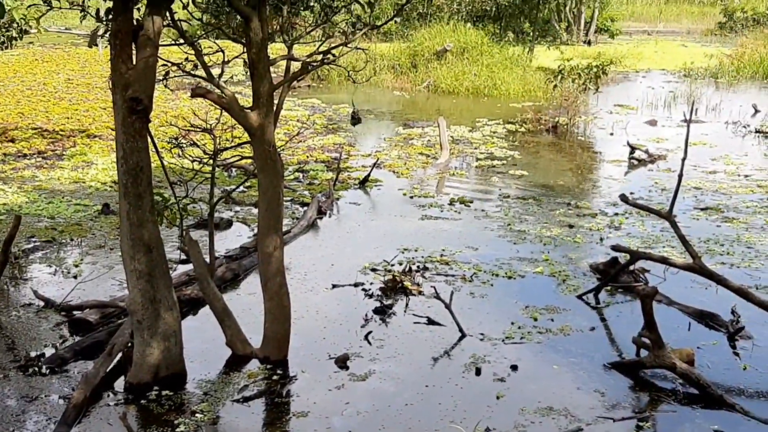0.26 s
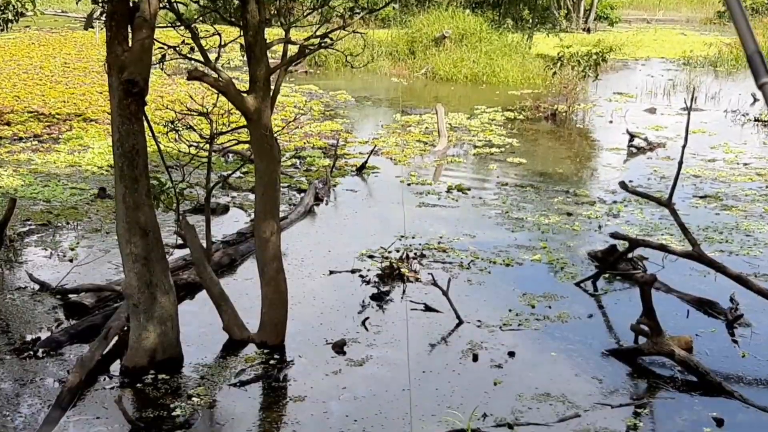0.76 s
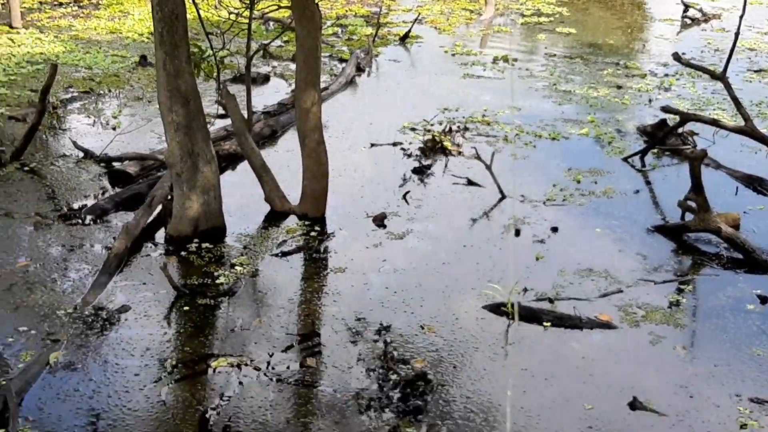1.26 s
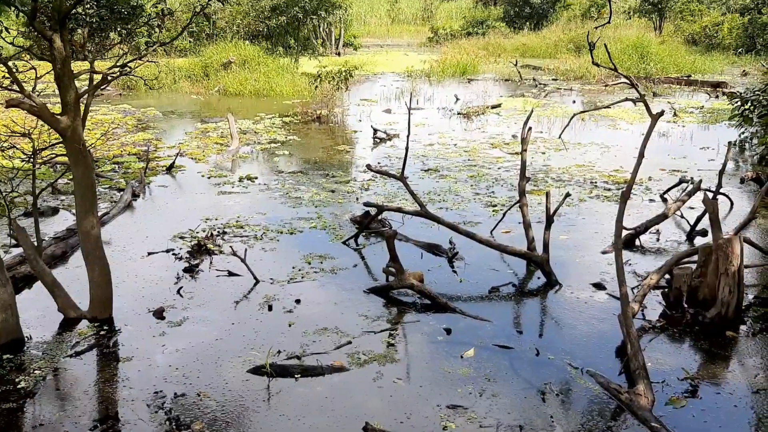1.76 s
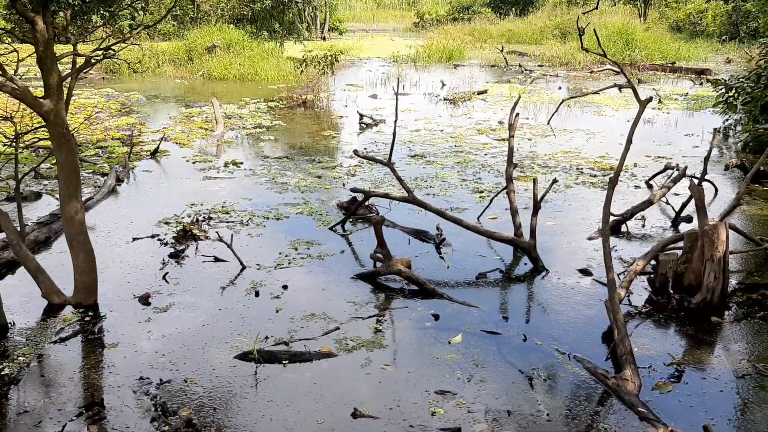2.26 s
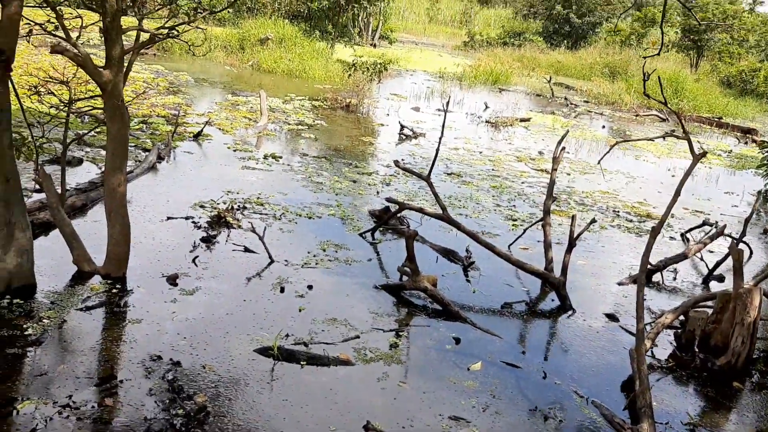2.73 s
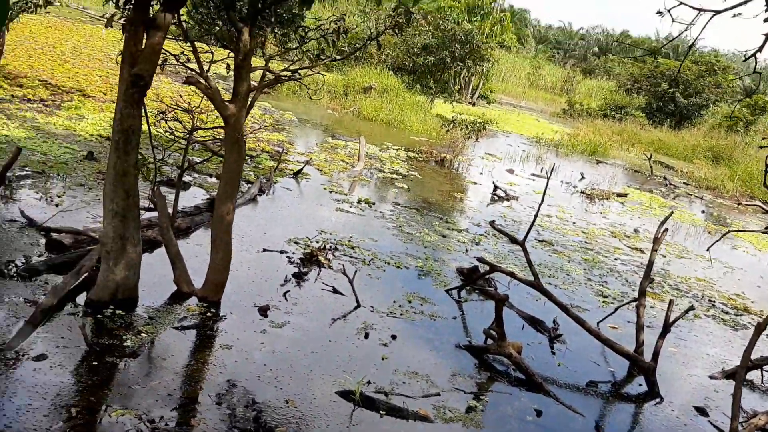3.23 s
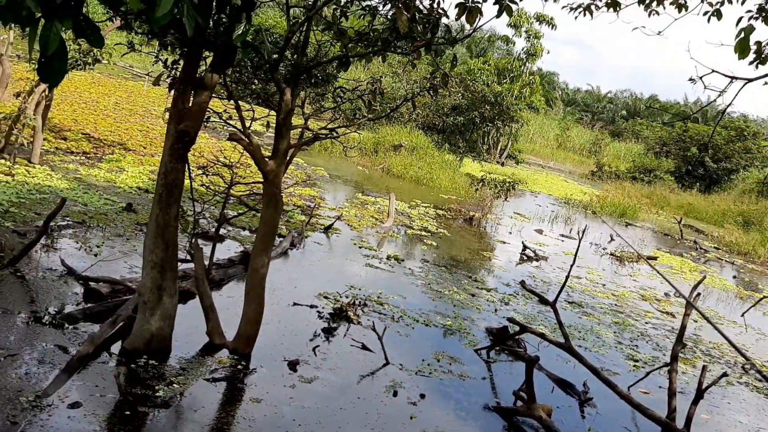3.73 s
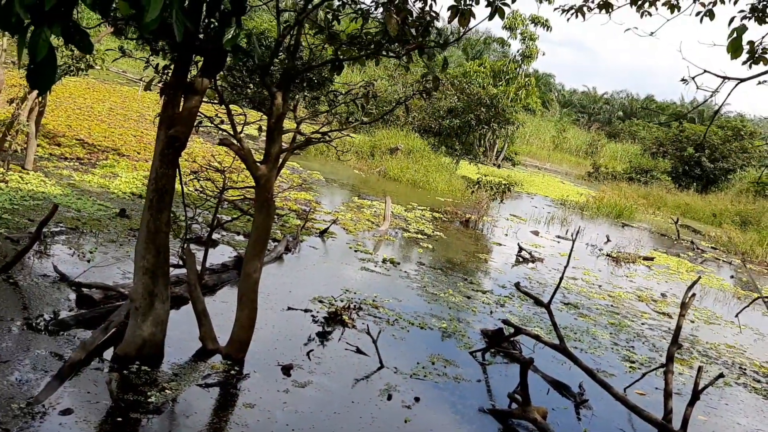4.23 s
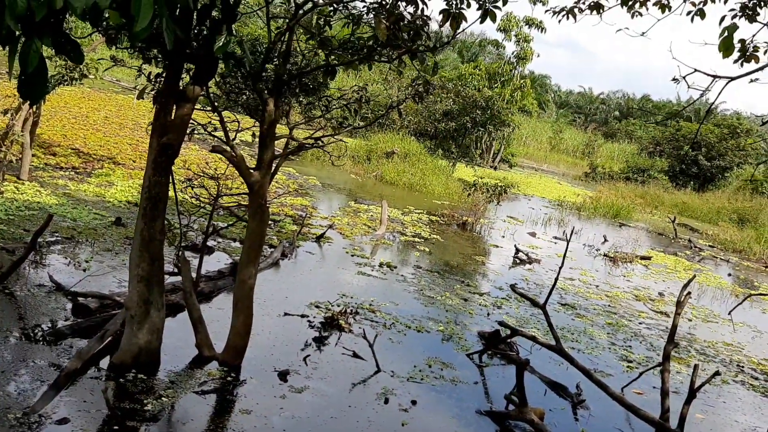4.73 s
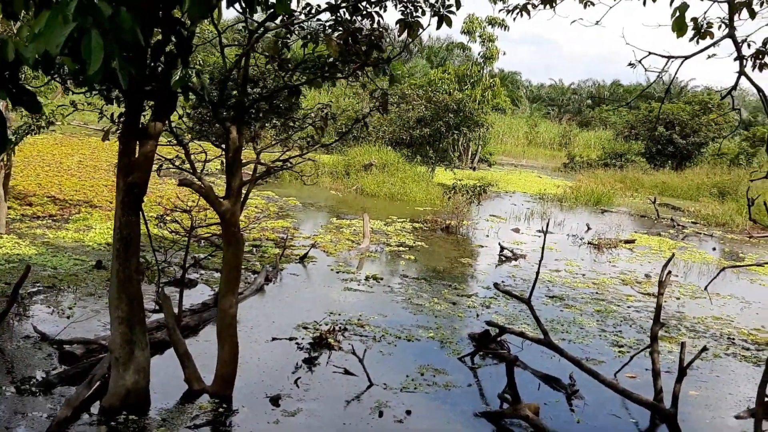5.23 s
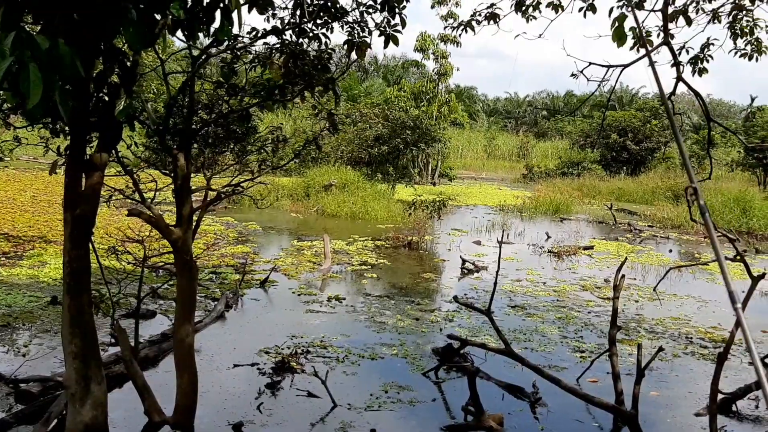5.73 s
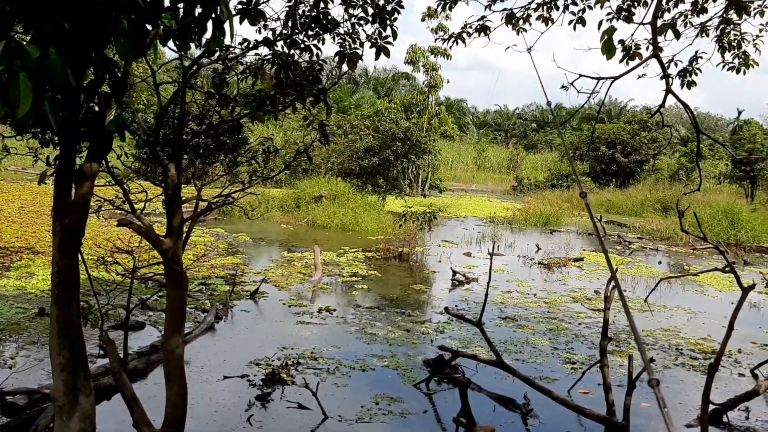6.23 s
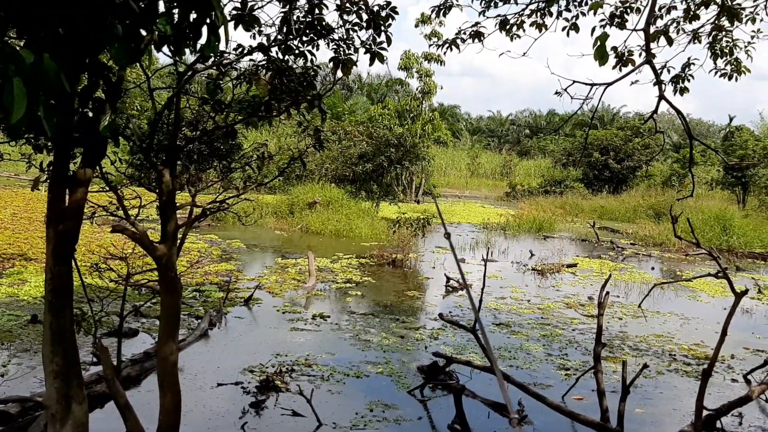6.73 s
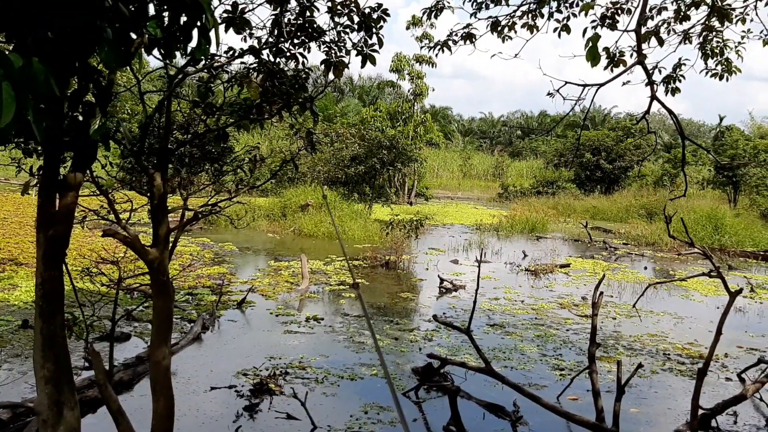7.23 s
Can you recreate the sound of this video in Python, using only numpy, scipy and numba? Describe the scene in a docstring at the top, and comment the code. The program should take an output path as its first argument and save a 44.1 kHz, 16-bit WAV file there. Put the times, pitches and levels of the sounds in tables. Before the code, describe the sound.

A quiet swamp, heard in stereo from close to the angler. Thin leaf and insect hiss, a low distant engine that revs and drops, and a very high katydid pulsing five or six times a second in bouts form the background. At 0.7 s a faint far whistle glides down; small watery drips plink around 1.8-2.0 and 2.4 s. At 2.88 s the reel's bail snaps open, loud, hard and metallic, with a short woody tail from the trees. Around 3.3-3.55 s come smaller clicks, a fast airy swish and a thin whistle of taut line; a dense, bright ticking whir then fades until about 5. A frog rasps four times from 4.16 to 4.6 s, slightly right. Wind buffets low on the left near 4.8, the engine swells, and light hollow knocks sound at 5.0-5.6. At 5.68 s the bail clacks shut, its wire singing briefly. Faint whistles and tiny taps follow, with insect and engine continuing to 7.4.

```python
"""Cast at the edge of a swamp. An engine drones and air hisses far off; a katydid throbs (shaped noise strokes)
and far whistles (gliding tones) and drips (short rings) come first. Then the reel's bail snaps open (rattles
that ring metal), the rod swishes (noise in moving bands) and line whirs off the spool (dense ticks and hiss).
A frog rasps four times on the right (pulses ringing a throat), wind buffets (low noise), the rod knocks,
the bail snaps shut and its wire sings; more whistles follow. Trees return near sounds as noisy tails."""
import sys
import numpy as np
from scipy import signal
from scipy.fft import rfft, irfft, next_fast_len
from scipy.io import wavfile
from scipy.ndimage import uniform_filter1d, map_coordinates
from numba import njit

SR = 44100
rng = np.random.default_rng(int(sys.argv[2]) if len(sys.argv) > 2 else 0)


def generate_wav(signal):
    """Clip the signal to [-1, 1] and save it as 16-bit WAV at the path in sys.argv[1]."""
    frames = np.transpose(np.atleast_2d(signal))
    scaled = np.clip(frames, -1, 1) * 32767
    pcm = np.round(scaled).astype(np.int16)
    wavfile.write(sys.argv[1], SR, pcm)


N = 329768

# Blows of the bail and reel; level is the peak of the reel part, wire is relative to it:
# start_s, level_db, wire_db, left_minus_right_db, rattle_s, left_lag_ms
CLICKS = [(2.872, -31.5, 7, 2.5, 0.00087, .09), (2.8766, -12.5, 3, -18, 0.0017, .09),
          (2.878, -8.5, 11.5, 0, 0.00082, .09), (2.880, -15, -4, 6, 0.0011, .09),
          (2.882, -17, -8, 12, 0.0012, .09), (2.8847, -18, -6, 2, .0006, .09),
          (3.305, -26.5, -6, 15.5, 0.00041, .09), (3.342, -22.5, -19, 6, 0.0004, .09),
          (3.4008, -22, -9, 9, 0.0031, .2), (3.406, -26, -14, -8, 0.00086, .2),
          (3.477, -16, -8, 3, 0.00069, .2), (3.565, -30.5, -15, -17, .0006, .2),
          (4.958, -44, 9, -2, 0.0026, .09), (5.031, -36, -5, 1, 0.0007, .09),
          (5.097, -45, -12, 4, 0.0011, .09), (5.3311, -35.5, -22, -2.5, 0.00058, .09),
          (5.592, -36.5, -15, -6, 0.00091, .09), (5.658, -24, 5, 4.5, 0.001, .14),
          (5.6596, -22, 5, 4, .0004, .14), (5.663, -29, 2, 2, 0.0033, .14),
          (5.6764, -10, 2, -5, .0008, .11), (5.6839, -10.5, 5.5, 15, 0.0014, .01),
          (5.6853, -15, 4.5, -6.5, 0.001, .01), (5.693, -23.5, -3.5, 4.5, 0.0009, .09),
          (5.7041, -19, 3.5, 7, 0.0003, .23), (5.7067, -24, 0.5, -16, 0.002, .23),
          (5.71, -25.5, 2.5, 16.5, 0.0011, .23), (6.414, -55.5, 11, 9, 0.00097, .09),
          (6.434, -44.5, -23, 13, 0.00087, .09), (6.527, -47, -16, 1, 0.0011, .09)]
# Resonances of the reel body: pitch_hz, width_hz, level_db
REEL_MODES = [(510, 1100, -11), (1620, 800, 1), (3320, 2040, -3), (5200, 1300, -3)]
# Resonances of the bail wire: pitch_hz, width_hz, level_db
BAIL_MODES = [(6827, 6500, -1), (8730, 350, -8), (10850, 1700, -3), (14100, 500, -3), (15800, 1900, -10)]
# What the trees return of a click: pitch_hz, width_hz, level_db
SCATTER_BANDS = [(580, 910, -11), (1790, 2500, -3.5), (3840, 2400, 2.5), (11000, 7300, -2)]
# Air rushing past the rod; low_db is the share near 935 Hz against the hiss:
# time_s, level_db, hiss_centre_hz, low_db
RUSH = [(3.33, -61, 1500, -4), (3.35, -48, 1900, -16), (3.38, -54, 1800, -13), (3.403, -36.5, 1975, -13),
        (3.415, -38, 2114, -14), (3.435, -49, 2880, 1), (3.46, -44, 3860, -6), (3.482, -43.5, 2380, -5),
        (3.51, -57, 3600, 1), (3.55, -52, 3000, -4), (3.75, -67, 2485, -8)]
# Whistle of the taut line: pitch_hz, width_hz, top_level_db
LINE_WHISTLE = [(1560, 130, -53), (2840, 200, -64), (3580, 130, -54.5)]
# Line leaving the spool; high_db is the treble share before fixed lifts: time_s, level_db, high_db
SPOOL = [(3.3, -66, -8), (3.35, -51, -8), (3.385, -50, 2), (3.405, -44.5, 5.5), (3.483, -42.5, 10),
         (3.58, -45, 10.5), (3.71, -51.5, 13.5), (4.124, -61, 15), (4.2, -57.5, 8), (4.45, -59, 4.5),
         (4.694, -56, 5), (4.8, -66.5, 6), (4.95, -75, 11), (5.1, -78.5, 20.5)]
# Lower resonances of the whirring line: pitch_hz, width_hz, level_db
SPOOL_LOW = [(1440, 280, -1), (3220, 2300, 0), (5400, 2000, -5)]
# Upper resonances of the whirring line: pitch_hz, width_hz, level_db
SPOOL_HIGH = [(7800, 5900, -0.5), (11900, 4500, 2.5), (16000, 5000, 1.5)]
# The rod sinks after the cast, so the lag of the left port shrinks: time_s, left_lag_ms
SPOOL_LAG = [(3.7, .235), (4.12, 0.19)]
# Frog calls; start_db is relative to the top: start_s, level_db, swell_s, start_db, length_s
FROG = [(4.158, -35, 0.037, -12.5, 0.051), (4.296, -34, 0.028, -5.5, .04), (4.432, -34, 0.0295, -6, 0.041),
        (4.576, -35, 0.023, -2, 0.043)]
# Fixed upper resonances of the frog: pitch_hz, width_hz, level_db
FROG_THROAT = [(2015, 230, -3), (2720, 140, -6.5), (3356, 550, 3.5), (3980, 100, -9)]
# Hollow knocks of the rod: start_s, low_mode_db, high_mode_db, left_minus_right_db, echo_share_db
KNOCKS = [(2.878, -25, -30, 1.5, -8.5), (4.9565, -47, -60, 5, -18), (5.028, -44, -50, 4, -9),
          (5.162, -56, -51, -2, -15), (5.350, -60.5, -36.5, 0.5, -9), (5.584, -59, -38.5, -1.5, -9),
          (5.594, -56.5, -30, -6, -5), (5.6772, -47.5, -17, 3, -34)]
# Modes of the hollow rod: pitch_hz, time_to_fall_60_db_s
ROD_MODES = [(830, .02), (1730, 0.011)]
# Taps of a line guide: start_s, low_mode_db, high_mode_db, left_minus_right_db
TAPS = [(5.0285, -42, -47, 0), (6.408, -68, -57, 3), (6.433, -54, -50, -1)]
# Drips: start_s, level_db, pitch_hz, left_minus_right_db, held_s
DRIPS = [(1.808, -51.5, 1507, 8, 0.0059), (1.833, -50.5, 1465, 1.5, 0.0077), (1.893, -50.5, 1550, 7, .001),
         (1.938, -48.5, 2810, -2, .001), (2.005, -54, 1500, 5, 0.0035), (2.3965, -46.5, 1770, 0, 0.00479),
         (2.441, -39.5, 1896, 4, 0.002), (2.4466, -46, 1860, 7, 0.0011)]
# Katydid bouts of even strokes; levels are before the stroke's own swell:
# first_s, last_s, stroke_period_s, first_db, last_db
KATYDID = [(.108, .663, 0.185, -42, -45.5), (1.504, 1.51, .18, -47.5, -46),
           (1.861, 3.29, .1785, -43.5, -43), (3.86, 4.36, 0.167, -44, -39), (4.555, 5.22, .166, -40.5, -42),
           (5.36, 5.52, .16, -43, -39.5), (5.877, 7.352, 0.1844, -50, -44)]
# Spectrum of the katydid's wings: pitch_hz, level_db_per_hz
KATYDID_WING = [(4710, -37.5), (8000, -48.5), (9360, -33.5), (10400, -8), (12500, 1), (14200, 7.5),
                (14900, 9.5), (16000, 1.5)]
# Far whistles; levels are before the blur:
# start_s, length_s, held_pitch_hz, last_pitch_hz, held_share_of_length, level_db
BIRDS = [(0.66, 0.5, 4450, 3960, .25, -68), (5.92, .14, 2420, 2400, .5, -79),
         (6.07, .09, 2060, 2020, .5, -77), (6.2, 0.3, 2770, 2790, .5, -76),
         (6.46, 0.42, 2810, 2850, .5, -77)]
# Far engine, revved and let go: time_s, firing_rate_hz, level_db
ENGINE = [(0.0, 26.22, -66), (0.46, 28.08, -55.5), (0.73, 24.26, -66), (1.15, 25.66, -59.5),
          (1.39, 22.49, -69), (1.58, 27.07, -60.5), (1.71, 28.5, -76), (1.92, 29.76, -47),
          (2.14, 24.72, -59.5), (2.31, 24.25, -56.5), (2.58, 26.9, -67), (2.75, 27.27, -55),
          (3.0, 28.44, -57), (3.16, 29.58, -46.5), (3.3, 24.79, -57), (3.78, 24.4, -55.5),
          (3.95, 26.82, -46), (4.25, 21.32, -66), (4.75, 29.28, -42), (5.2, 30.43, -41.5),
          (5.45, 31.14, -45), (5.65, 30.98, -40), (5.74, 30.93, -48), (6.14, 29.09, -56),
          (6.33, 31.28, -46.5), (6.55, 26.39, -67.5), (6.8, 25.92, -53), (7.21, 23.01, -66),
          (7.41, 25.23, -54.5)]
# Weight the exhaust gives each pitch: pitch_hz, gain_db
EXHAUST = [(25, -34), (60, -17.5), (95, -12), (125, -8.5), (155, -1.5), (185, -2), (205, -17), (250, -21.5),
           (345, -22), (390, -33.5), (600, -54.5)]
# Wind gusts at the ports, before the left-right difference: time_s, peak_db
GUSTS = [(4.6, -53), (4.785, -40.5), (4.99, -48), (5.29, -53.5), (5.69, -62.5)]
# Spectrum of leaves and far insects: pitch_hz, level_db_per_hz
AIR = [(18, -52.5), (30, -40.5), (98, 0), (179, -9), (364, -15.5), (512, -17), (801, -21), (1540, -24),
       (1670, -24.5), (3580, -25.5), (7470, -36), (14800, -18.5), (16000, -9.5)]
# Loudness of that hiss in a band around 750 Hz: time_s, level_db
AIR_LEVEL = [(0.0, -66.5), (1.41, -66.5), (1.75, -69.5), (2.1, -68.5), (2.69, -69.5), (3.1, -65),
             (3.6, -68), (4.39, -69.5), (5.56, -68), (5.75, -75.5), (6.71, -74.5), (7.48, -72.5)]
# Rustles of the sleeve and line guides: time_s, peak_db, fade_db_per_s
RUSTLE = [(1.91, -58.5, 88), (5.345, -56, 298), (5.596, -52.5, 296.5), (6.42, -68.5, 77)]

# The rod tip moves fastest at WHIP_S
WHIP_S, WHIP_SWELL_DB_PER_S, WHIP_FADE_DB_PER_S = 3.268, 106, 198
WHISTLE_RISE_PER_S = .5  # the pitch climbs by this share a second as the line tightens
FROG_SAC_HZ, FROG_SAC_ECHO_DB = (1692, 1357), -9.5  # the low resonance holds, then sinks
FROG_SINK_S, FROG_PURE_DB, FROG_OCTAVE_DB, FROG_UPPER_DB = 0.0197, -1.5, -2.5, 1.5
GUIDE_MODES = [(2060, 0.011), (4100, .008)]  # pitch_hz, time_to_fall_60_db_s
TAP_ECHO_DB, DRIP_ECHO_DB, DRIP_T60_S = 2, -3, 0.012
DRIP_ROUGH, KNOCK_ROUGH = 0.402, 0.52  # depth of the random waver, as a share of the tone
CHORUS_HZ, CHORUS_WIDTH_HZ, CHORUS_DB = 1510, 200., -87  # faint far calls in one band
BIRD_BLUR_HZ = 61
GUST_FADE_DB_PER_S, BREEZE_DB, BREEZE_FLUTTER_DB = 219, -70.5, 3
RUSTLE_RISE_DB_PER_S = 700
TOP_HZ = 15550


def clicks():
    """Blows rattle and ring the reel body and bail wire; also gives the snap that reaches the trees."""
    out, snap, t = np.zeros((2, N)), np.zeros(N), np.arange(1500) / SR
    for s, db, wire_db, pan_db, length, lag_ms in CLICKS:
        contact = np.minimum(t / 0.00014, 1) * undb(-60 * np.maximum(t - length, 0) / 0.0045)
        # small parts radiate no bass, so take differences of the noise
        rattle = np.diff(rng.standard_normal((2, len(t))) * contact, prepend=0)
        low = body(rattle[0], REEL_MODES)
        high = body(rattle[0], BAIL_MODES)
        blow = low / np.abs(low).max() + undb(wire_db) * high / np.abs(high).max()
        # the parts are spread out: a second rattle, opposite at the two ports, widens the blow
        second = unit(body(rattle[1], REEL_MODES + BAIL_MODES))
        wide = 0.6 * np.std(blow) * second * np.array([[1], [-1]])
        add(out, s, undb(db) * (ports(blow, pan_db, lag_ms) + wide))
        snap[int(s * SR)] = undb(db) * np.sqrt(np.sum(blow ** 2))
    return out, body(snap, SCATTER_BANDS)[None]


def swish():
    """Eddies shed by the rod make a broad rush; the taut line whistles in narrow bands as the tip whips."""
    eddies = rng.standard_normal(N)
    # the pitch climbs over the last 0.2 s before the whip
    tight = 1 + WHISTLE_RISE_PER_S * np.clip(np.arange(N) / SR - WHIP_S, -.2, 0)
    whistle = np.zeros(N)
    for hz, width, level_db in LINE_WHISTLE:
        once = svf(eddies, hz * tight, 1. * width)
        whistle += undb(level_db) * unit(svf(once, hz * tight, 2. * width))
    whip = peak(WHIP_S, 0, WHIP_SWELL_DB_PER_S, WHIP_FADE_DB_PER_S)
    db, hz, low_db = curves(RUSH, -120)
    hiss = unit(svf(eddies, hz, 1500.)) * undb(2.5 * walk(45))
    low = unit(body(eddies, [(935, 1000, 0)])) * undb(low_db + 1.3 * walk(60))
    return ports(whip * whistle + undb(db) * (hiss + low), 3.8, 0.4)


def whir(high_db):
    """Coils of line tick densely over a hiss; each resonance wavers on its own."""
    flick = grains(3500, 1.8) + 0.55 * rng.standard_normal(N)

    def wavering(modes):
        """Resonances with separate random levels, neighbours in opposite phase."""
        return unit(sum((-1) ** k * undb(1.7 * walk(25)) * body(flick, [mode]) for k, mode in enumerate(modes)))

    return undb(10.0) * wavering(SPOOL_LOW) + undb(high_db + 3.5) * wavering(SPOOL_HIGH)


def spool():
    """Line flicks the spool lip, heard at both ports, and the guides, heard separately at each port."""
    db, high_db = curves(SPOOL, -120)
    lip = whir(high_db)
    late = map_coordinates(lip, [np.arange(N) - curves(SPOOL_LAG)[0] * SR / 1000])
    shared = 0.68 * np.array([undb(-3.5) * late, lip])  # stronger and earlier on the right
    guides = np.array([0.5 * whir(high_db), 0.29 * whir(high_db)])
    return undb(db + 1.1 * walk(110)) * (shared + guides)


def frog():
    """Ragged throat pulses and a clear sinking note with its octave ring the sac and upper resonances."""
    out, away, t = np.zeros((2, N)), np.zeros((2, N)), np.arange(6000) / SR
    for s, db, swell, start_db, length in FROG:
        # about 195 pulses a second, each a tick followed by noise
        phase = np.cumsum(195 * (1 + 0.058 * walk(150)[:len(t)])) / SR % 1
        tick = (np.diff(phase, prepend=0) < 0) * 6.8
        pulses = tick + np.exp(-phase / 0.87) * rng.standard_normal(len(t))
        hz = np.interp(t, np.array([length - FROG_SINK_S, length]), FROG_SAC_HZ)
        turn = 2 * np.pi * np.cumsum(hz * (1 + 0.021 * walk(300)[:len(t)])) / SR
        sac = unit(svf(svf(pulses, hz, 160.0), hz, 180.0))
        low = unit(sac + undb(FROG_PURE_DB) * np.sin(turn))
        octave = undb(FROG_OCTAVE_DB + 2.5 * walk(250)[:len(t)]) * np.sin(2 * turn)
        # each resonance acts twice, which leaves deep valleys between them
        upper = sum(body(body(pulses, [(hz_, width, level_db)]), [(hz_, width, 0)])
                    for hz_, width, level_db in FROG_THROAT)
        throat = undb(FROG_UPPER_DB) * unit(upper) + octave
        effort_db = np.interp(t, [0, swell, length, length + 0.019, t[-1]], [start_db, 0, -10, -49, -49])
        effort = undb(db + effort_db)
        add(out, s, ports(effort * (low + throat), -7.5, 0.42))
        # the trees return mostly the upper resonances
        add(away, s, ports(effort * (undb(FROG_SAC_ECHO_DB) * low + throat), 1.0, 0.42))
    return out, away


def struck(mode_db, modes, pan_db):
    """A knock on a solid part sounds all its modes together."""
    return sum(ring(db, hz, pan_db, t60, KNOCK_ROUGH) for db, (hz, t60) in zip(mode_db, modes))


def drips_and_knocks():
    """Drips, hollow rod knocks, guide taps and wire ring; also the part that goes out to the trees."""
    out, away, sounds = np.zeros((2, N)), np.zeros((2, N)), []
    for s, db, hz, pan_db, held in DRIPS:
        sounds.append((s, ring(db, hz, pan_db, DRIP_T60_S, DRIP_ROUGH, held), DRIP_ECHO_DB))
    for s, *mode_db, pan_db, echo_db in KNOCKS:
        sounds.append((s, struck(mode_db, ROD_MODES, pan_db), echo_db))
    for s, *mode_db, pan_db in TAPS:
        sounds.append((s, struck(mode_db, GUIDE_MODES, pan_db), TAP_ECHO_DB))
    # the shut bail wire sings once
    add(out, 5.7058, ring(db=-12, hz=8700, pan_db=-4, t60=.016, rough=KNOCK_ROUGH))
    for s, heard, echo_db in sounds:
        add(out, s, heard)
        add(away, s, undb(echo_db) * heard)
    return out, away


def trees(x, t60, db):
    """Trunks and leaves scatter sound back as a short noisy tail."""
    t = np.arange(int(.5 * SR)) / SR
    tail = rng.standard_normal((2, len(t))) * undb(-60 * t / t60) * np.minimum(t / 0.0041, 1)
    tail /= np.sqrt(np.sum(tail ** 2, axis=1, keepdims=True))
    return undb(db) * signal.fftconvolve(x, tail, axes=1)[:, :N]


def katydid():
    """Each wing stroke swells and fades, throbbing as the teeth of the file pass."""
    stroke, t = np.zeros((1, N)), np.arange(9000) / SR
    for first, last, period, first_db, last_db in KATYDID:
        for s in np.arange(first, last + period / 2, period):
            swell = (t / 0.028) ** 1.04 * np.exp(-t / 0.04)
            throb = 1 + 0.39 * np.cos(2 * np.pi * (60 * t + rng.random()))
            level = undb(np.interp(s, [first, last], [first_db, last_db]))
            add(stroke, s - .007, level * (swell * throb)[None])
    # scattered by leaves, so each port gets its own noise
    return stroke * np.array([coloured(KATYDID_WING), coloured(KATYDID_WING)])


def birds():
    """Thin far whistles glide, swell and fade, blurred by the air; faint calls waver in one band."""
    out, t = np.zeros(N), np.arange(N) / SR
    for s, length, first_hz, last_hz, held, db in BIRDS:
        hz = np.interp(t, [s + held * length, s + length], [first_hz, last_hz])
        swell = np.sin(np.pi * np.clip((t - s) / length, 0, 1)) ** 2
        blur = undb(5.3 * walk(BIRD_BLUR_HZ))
        turn = 2 * np.pi * np.cumsum(hz + 11.0 * walk(BIRD_BLUR_HZ)) / SR
        out += undb(db) * swell * blur * np.sin(turn)
    band = [(CHORUS_HZ, CHORUS_WIDTH_HZ, 0)]
    chorus = unit(body(body(rng.standard_normal(N), band), band))
    out += undb(CHORUS_DB + 6.7 * walk(14)) * chorus
    return ports(out, 2.0, .1)


def engine():
    """Multiples of the firing rate, weighted by the exhaust and wavering over the distance, plus noise."""
    hz, db = curves(ENGINE)
    phase = 2 * np.pi * np.cumsum(hz) / SR
    at, gain_db = np.transpose(EXHAUST)
    drone = np.zeros(N)
    for k in range(1, 15):
        gain = undb(np.interp(k * hz, at, gain_db) + 2.58 * walk(6))
        drone += gain * np.cos(k * phase + 0.03 * k * walk(12) + 0.66 * rng.standard_normal())
    return ports(undb(db) * (drone + 0.28 * coloured(EXHAUST)), 2.1, 0.36)


def wind():
    """Low buffeting noise, unrelated at the two ports and stronger on the left."""
    shape = [(15, -13.0), (35, -4.5), (55, -1.0), (80, -3.5), (160, -47.5)]  # pitch_hz, level_db
    gusts = sum(peak(s, db, GUST_FADE_DB_PER_S, GUST_FADE_DB_PER_S) for s, db in GUSTS)
    blow = undb(BREEZE_DB + BREEZE_FLUTTER_DB * walk(8.4)) + gusts
    return np.array([undb(5.5) * coloured(shape), undb(-6.0) * coloured(shape)]) * blow


def air():
    """Far hiss of leaves and insects, unrelated at the two ports; close rustles made of dense ticks."""
    hiss = np.array([coloured(AIR) * undb(walk(8)) for _ in range(2)])
    hiss /= np.std(svf(hiss[0], np.full(N, 750.), 500.))
    cloth = [(1315, 1400, 11.5), (2590, 1400, 14.5), (4760, 1700, 12.0), (8826, 6000, -22.0)]
    rub = unit(body(grains(8000, 1.4), cloth))
    rustle = sum(peak(s, db, RUSTLE_RISE_DB_PER_S, fade) for s, db, fade in RUSTLE) * rub
    return hiss * undb(curves(AIR_LEVEL)[0]) + ports(rustle, 10.0, .1)


def undb(db):
    """Gain of a level in dB."""
    return 10 ** (np.asarray(db) / 20)


def unit(x):
    """Scaled to an rms (average strength) of 1."""
    return x / np.sqrt(np.mean(x ** 2))


def curves(table, quiet=None):
    """Every column over all samples; the level column may fall silent outside the table."""
    s, *columns = np.transpose(table)
    t = np.arange(N) / SR
    out = [np.interp(t, s, c) for c in columns]
    if quiet is not None:
        out[0] = np.where((t < s[0]) | (t > s[-1]), quiet, out[0])
    return out


@njit
def svf(x, hz, width):
    """Resonance (state-variable band-pass) with a moving centre, gain 1 there."""
    y, band, low = np.empty(len(x)), 0., 0.
    for i in range(len(x)):
        g, k = np.tan(np.pi * hz[i] / SR), width / hz[i]
        v = (band + g * (x[i] + 1e-18 - low)) / (1 + g * (g + k))
        band, low, y[i] = 2 * v - band, low + 2 * g * v, k * v
    return y


def body(x, modes):
    """Resonances side by side, neighbours in opposite phase."""
    return sum((-1) ** k * undb(db) * svf(x, np.full(len(x), 1. * hz), 1. * width)
               for k, (hz, width, db) in enumerate(modes))


def coloured(points):
    """Noise with a spectrum drawn through (pitch_hz, level_db) points, rms 1."""
    hz, db = np.transpose(points)
    size = next_fast_len(N)
    f = np.maximum(np.arange(size // 2 + 1) * SR / size, 1)
    gain = undb(np.interp(np.log(f), np.log(hz), db))
    return unit(irfft(rfft(rng.standard_normal(size)) * gain, size)[:N])


def walk(rate):
    """Random levels held 1 / rate s and smoothed twice; spread near 1."""
    k = int(SR / rate)
    steps = np.repeat(rng.standard_normal(N // k + 1), k)
    return 1.5 * uniform_filter1d(uniform_filter1d(steps, k), k)[:N]


def grains(per_s, spread_db):
    """Dense ticks of uneven size, rms 1."""
    ticks = (rng.random(N) < per_s / SR) * rng.standard_normal(N)
    return unit(ticks * undb(spread_db * rng.exponential(size=N)))


def peak(s, db, rise_db_per_s, fade_db_per_s):
    """Gain that climbs to a top at time s and falls, straight in dB."""
    t = np.arange(N) / SR - s
    return undb(db - rise_db_per_s * np.maximum(-t, 0) - fade_db_per_s * np.maximum(t, 0))


def ring(db, hz, pan_db, t60, rough, held=0):
    """A slightly rough tone holds and dies; the cavity takes a few cycles to build up."""
    t = np.arange(6000) / SR
    waver = 1 + rough * unit(uniform_filter1d(rng.standard_normal(len(t)), size=60))
    fade = undb(db - 60 * np.maximum(t - held, 0) / max(t60, .005))
    tone = np.sin(2 * np.pi * hz * t) * fade * waver
    return ports(body(tone, [(hz, 900, 0)]), pan_db, .1)


def ports(x, pan_db, lag_ms):
    """Left and right microphone ports hear a source at different levels, the left one later."""
    left = np.roll(x, round(lag_ms * SR / 1000))
    return np.array([left * undb(pan_db / 2), x * undb(-pan_db / 2)])


def add(out, s, sound):
    """Mix a short sound in at time s."""
    i = max(int(s * SR), 0)
    out[:, i:i + sound.shape[1]] += sound[:, :N - i]


def scene():
    """Near sounds with their echoes over the far ones."""
    reel, snap = clicks()
    cast = swish() + spool()
    call, far_call = frog()
    small, away = drips_and_knocks()
    echoes = trees(snap, 0.22, -4.5) + trees(cast, 0.14, -7.0)
    echoes += trees(away, 0.27, 0) + trees(far_call, 0.24, 0.18)
    return reel + cast + call + small + echoes + katydid() + birds() + engine() + wind() + air()


def record(dry):
    """Cuts the deepest bass, softly rounds the loudest peaks and cuts the top treble."""
    no_rumble = signal.sosfilt(signal.butter(2, 30, "high", fs=SR, output="sos"), dry)
    rounded = np.tanh(no_rumble)
    return signal.sosfilt(signal.ellip(10, .2, 70, TOP_HZ, fs=SR, output="sos"), rounded)


dry = scene()
out = record(dry)
generate_wav(out)
```